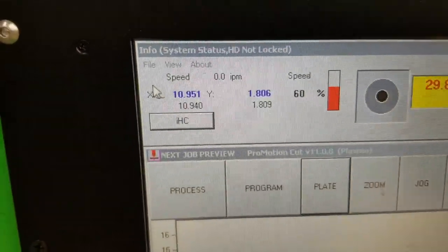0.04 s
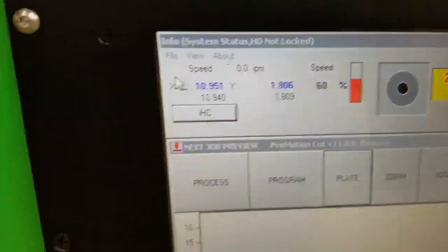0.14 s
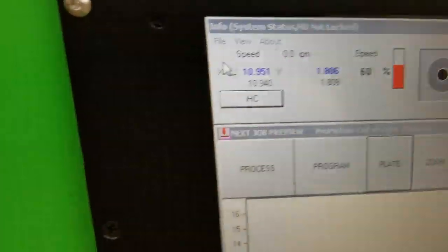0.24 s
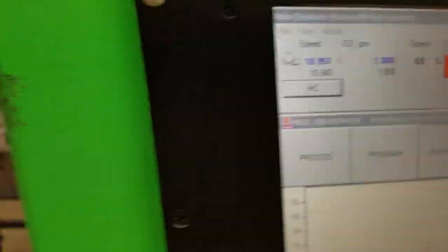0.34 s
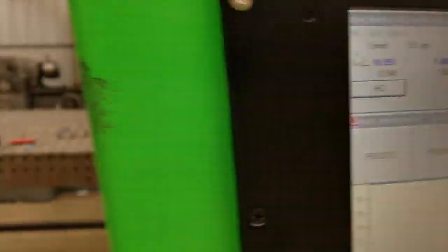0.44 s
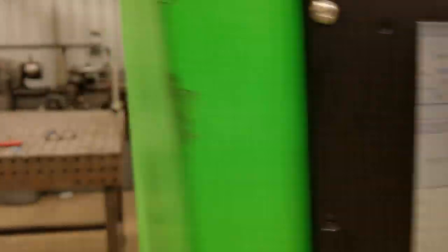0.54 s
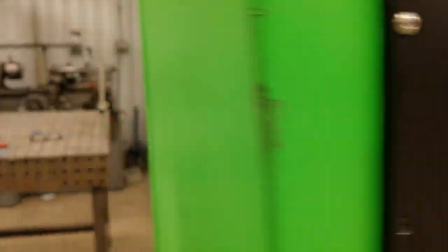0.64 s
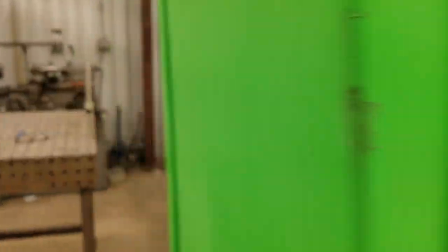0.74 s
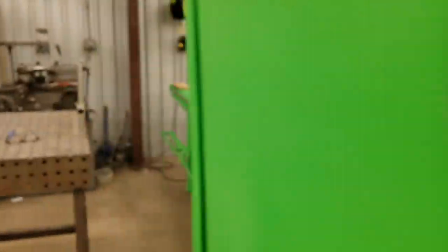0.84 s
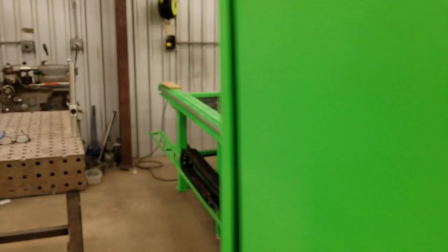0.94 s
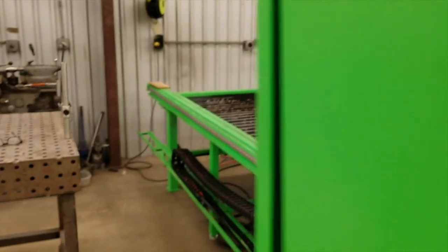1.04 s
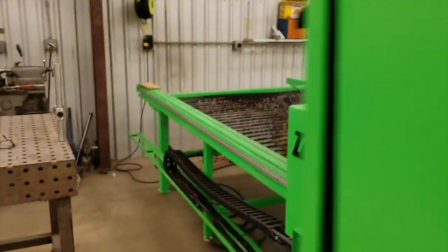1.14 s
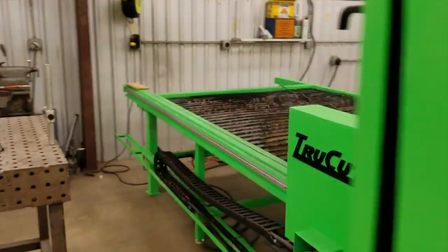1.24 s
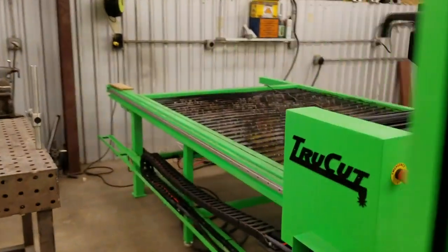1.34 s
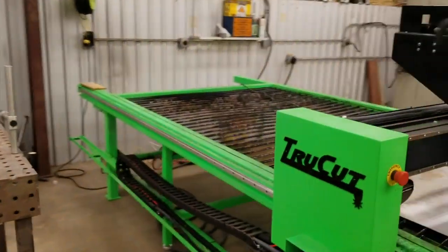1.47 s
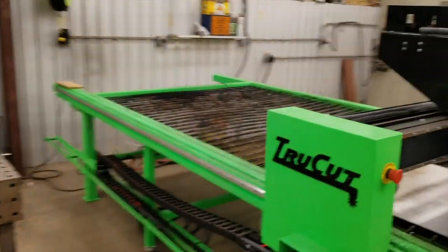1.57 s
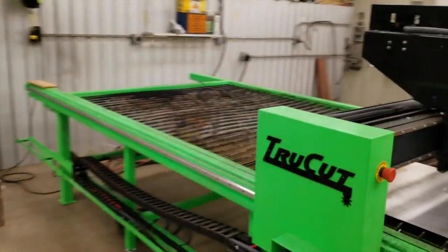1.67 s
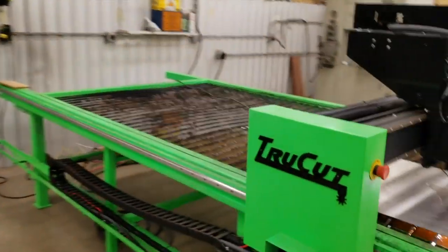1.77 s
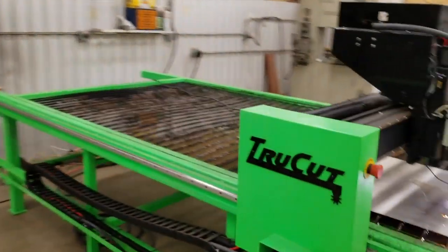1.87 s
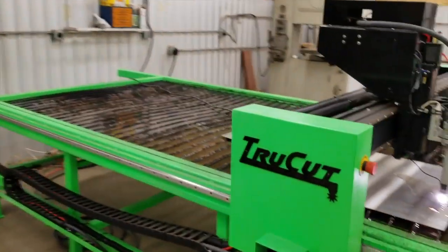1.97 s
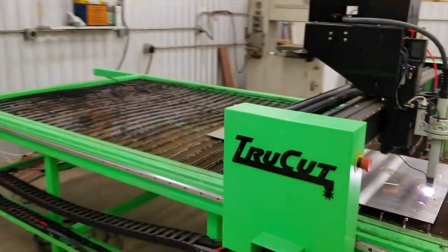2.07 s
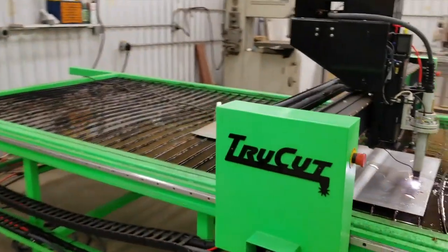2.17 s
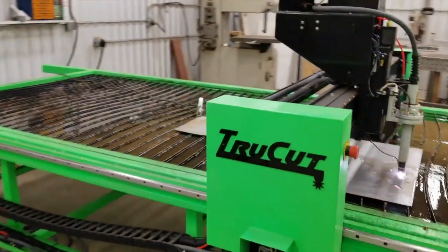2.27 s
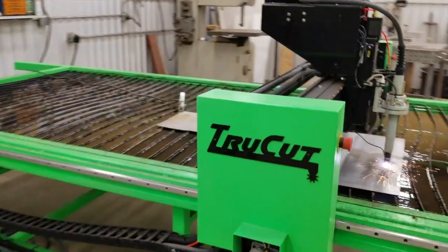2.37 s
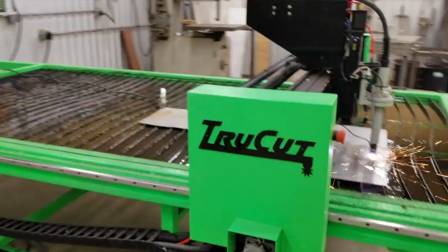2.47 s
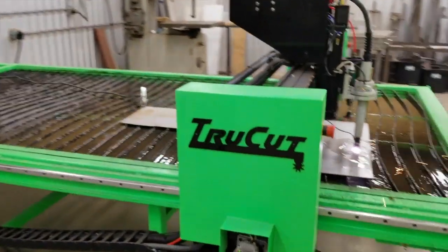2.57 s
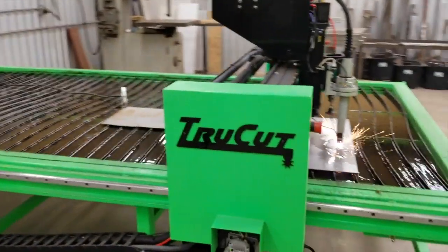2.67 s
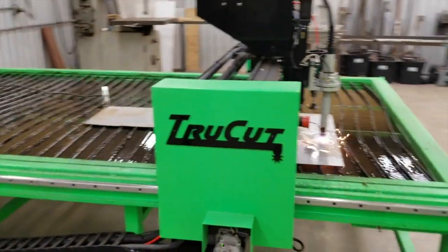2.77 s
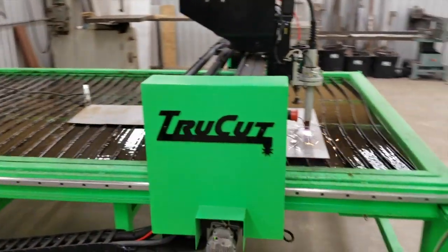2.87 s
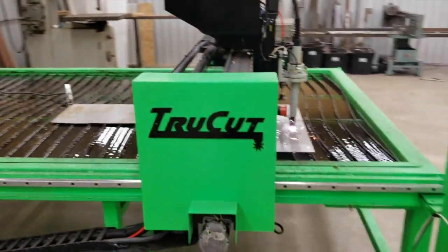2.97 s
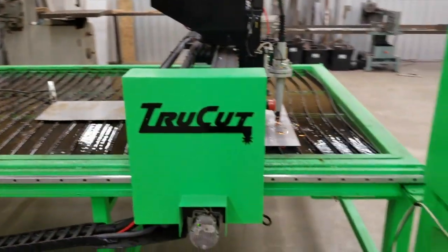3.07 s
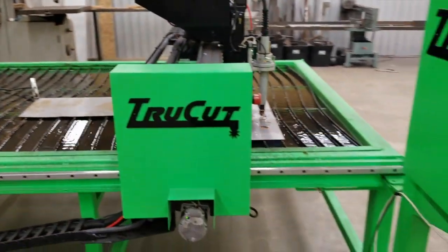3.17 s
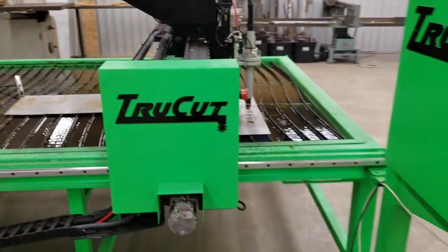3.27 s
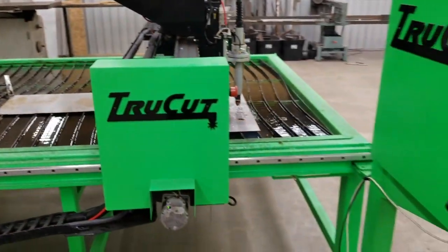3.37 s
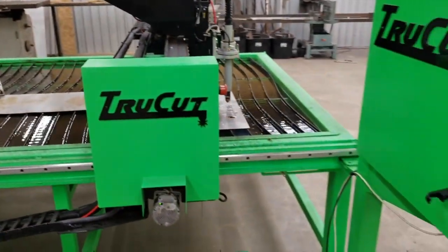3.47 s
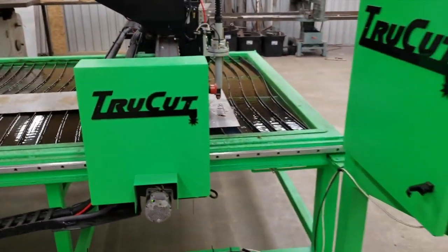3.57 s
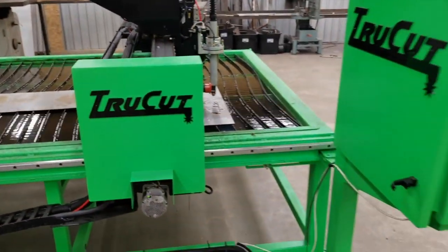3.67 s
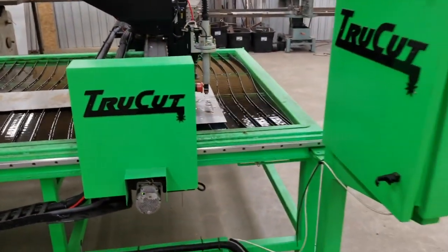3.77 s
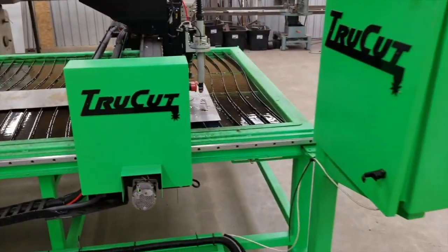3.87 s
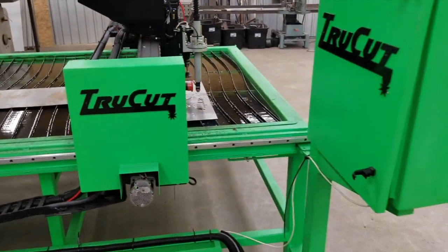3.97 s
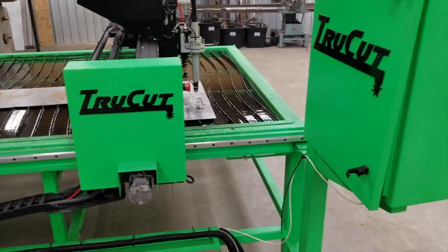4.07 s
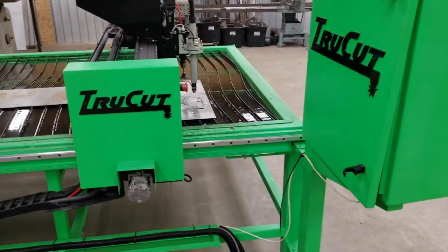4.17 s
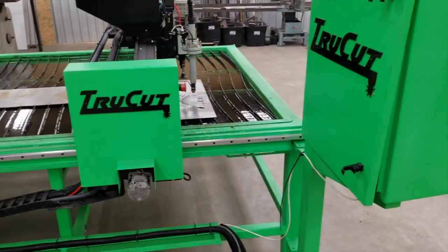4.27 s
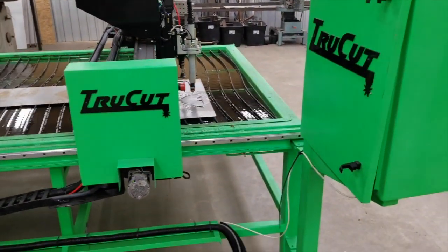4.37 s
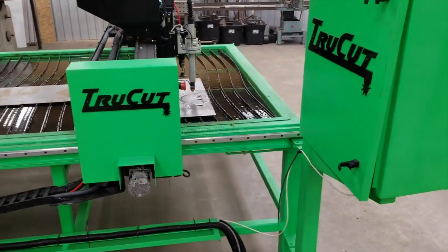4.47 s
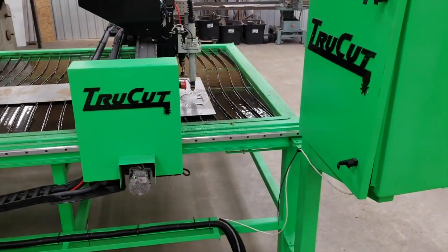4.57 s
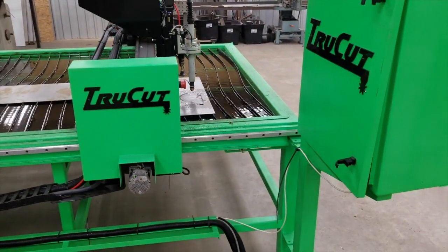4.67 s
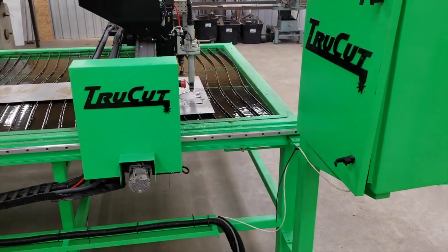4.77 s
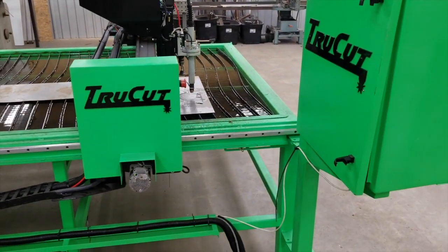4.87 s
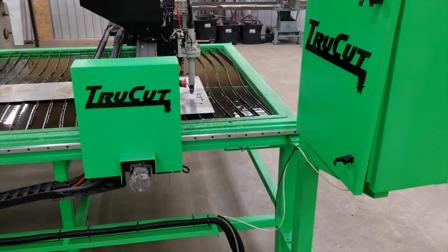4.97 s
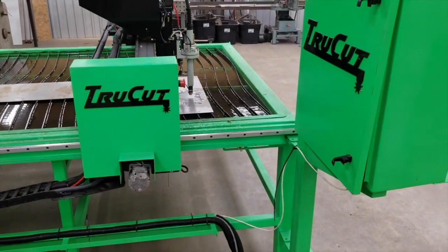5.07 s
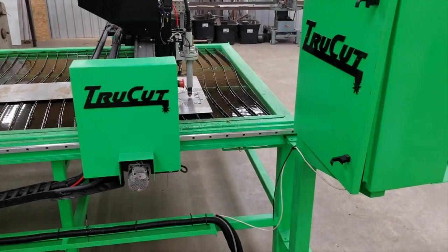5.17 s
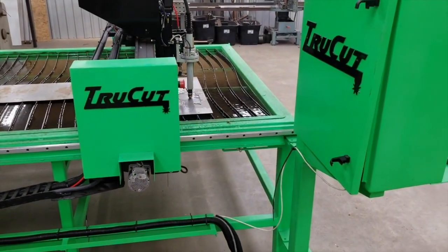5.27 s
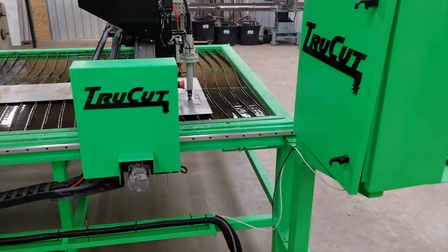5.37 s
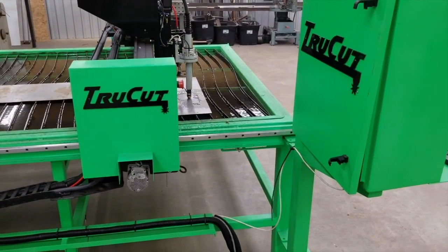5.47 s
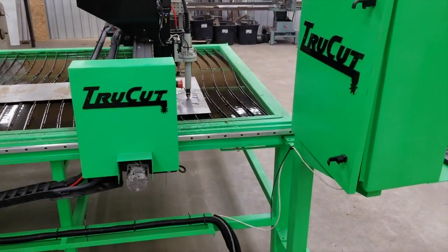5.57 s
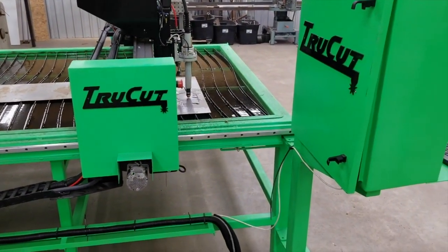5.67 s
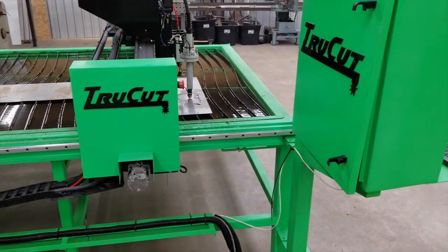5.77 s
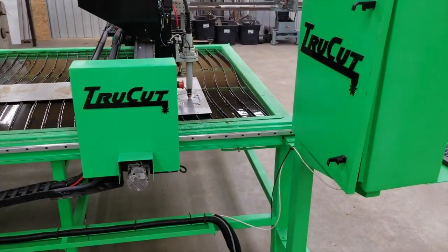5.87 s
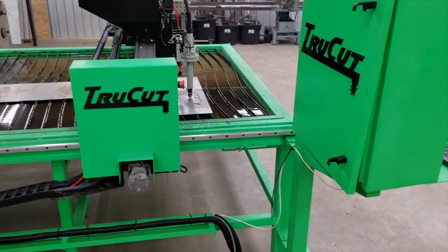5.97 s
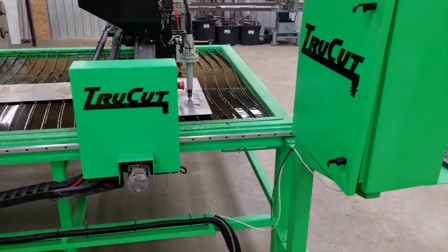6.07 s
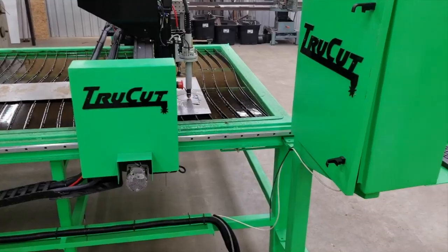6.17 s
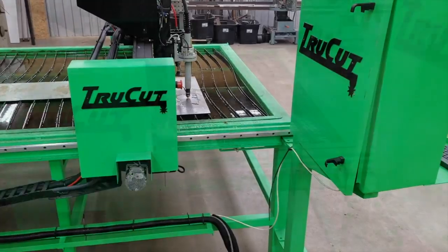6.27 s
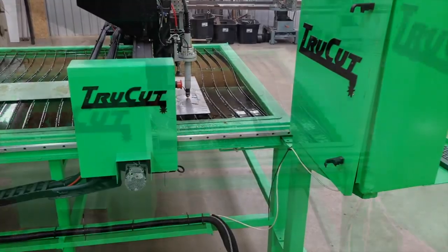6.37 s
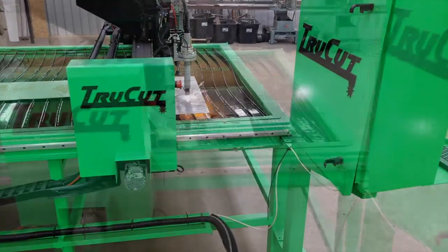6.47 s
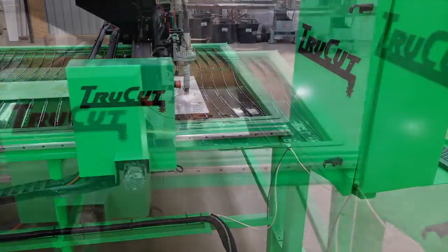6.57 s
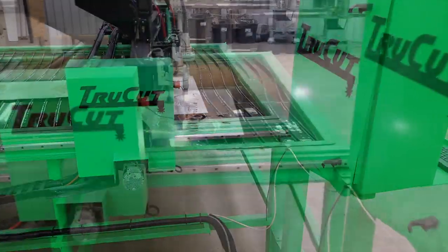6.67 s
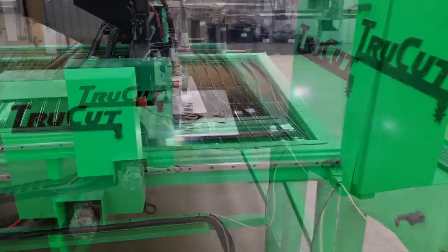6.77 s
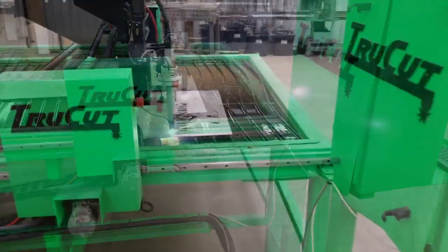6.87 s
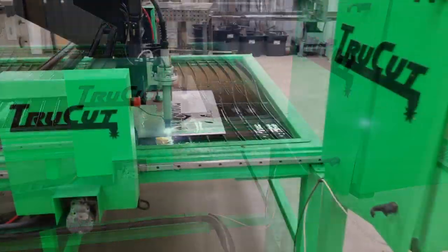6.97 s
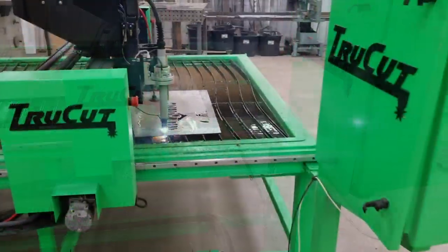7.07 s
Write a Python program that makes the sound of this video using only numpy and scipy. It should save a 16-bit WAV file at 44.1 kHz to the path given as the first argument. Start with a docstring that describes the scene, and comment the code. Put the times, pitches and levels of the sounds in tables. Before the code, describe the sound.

A plasma torch cuts steel sheet in a workshop, heard in stereo by a microphone moving round the table. From 0 to 1 s a bright, airy hiss with a rushing midrange runs steadily, then bleeds away quickly, leaving soft fan air and faint wavering hum. At about 1.57 s air hisses up, and at 1.69 s the arc snaps alight. Until about 3 s it pierces roughly: tearing surges, sputtering cracks near 2.4 s, sparks ticking, and water churning low beneath. The cut then calms into a steady hiss, with a fuller, lower roar around 4 s, thinning to a smoother, brighter rush until 5.7 s. It fades rapidly to quiet shop hum. At 6.3 s air builds again; a much sharper crack at 6.42 s starts another fierce, fluttering blast with sparks and bubbling, continuing to the end around 7.1 s.

```python
"""Plasma torch, walking the table

Place: a workshop with a plasma torch working through steel sheet; a stereo microphone pair walks round the table.
Twice the arc goes out and the air bleeds away; the valve reopens, the arc cracks alight and pierces the sheet.
Bands of unsteady noise make the hissing jet, the rushing, roaring slot and the churning water bed.
Rung impulses make the cracks and random clicks the sparks; fan air and wavering sine tones lie underneath."""
import sys
import numpy as np
from scipy import signal
from scipy.io import wavfile

SR = 44100
rng = np.random.default_rng(int(sys.argv[2]) if len(sys.argv) > 2 else 0)


def persist_wave(psi):
    """Save psi, clipped to +-1, as 16-bit WAV."""
    counts = np.round(np.clip(psi, -1, 1) * 32767).astype(np.int16)
    wavfile.write(sys.argv[1], SR, np.atleast_2d(counts).T)


N = 314414
TIME = np.arange(N) / SR

# Slow course of each cut, before the trim of each layer:
# t/s, sizzle at the tip level/dB, jet hiss level/dB, rush in the slot level/dB, roar under the sheet level/dB
CUTS = [
    [(0, -25, -28.5, -28.5, -28.5), (.4, -26.5, -28.5, -29, -32), (.75, -28, -29.5, -32, -40.5),
     (.93, -27, -30, -28.5, -35.5), (1.0, -27, -28.5, -33.5, -39.5)],
    [(1.7, -22, -28.5, -30, -35.5), (1.82, -23.5, -25, -31.5, -28), (2.3, -23, -28.5, -29, -31),
     (2.38, -17, -21, -39, -31), (2.52, -23, -21, -22.5, -38), (2.72, -27.5, -33.5, -30, -31),
     (2.97, -27, -27, -33.5, -35), (3.06, -27.5, -31.5, -39.5, -45.5), (3.3, -31.5, -30.5, -32, -39),
     (3.62, -33.5, -36, -28.5, -31.5), (3.8, -29.5, -36, -28, -28.5), (4.0, -29.5, -36, -28, -26),
     (4.1, -29, -34.5, -27.5, -29), (4.4, -27.5, -30, -31, -41), (5.05, -26, -29, -33.5, -39.5),
     (5.25, -26, -29, -31, -41.5), (5.69, -24.5, -29, -31.5, -44)],
    [(6.435, -26, -26.5, -26, -35), (6.48, -22.5, -32, -25, -37.5), (6.55, -26.5, -30, -27.5, -31.5),
     (6.7, -28.5, -31.5, -29.5, -33), (6.9, -29, -29.5, -30.5, -32.5), (7.07, -25, -26, -28.5, -26.5),
     (7.13, -26, -34, -30, -32)],
]
# Fall of sizzle, hiss, rush and roar (one row each) as the air bleeds away after a cut:
# level lost after one second/dB, power of time by which the fall steepens
BLEED = [(100, 1.48), (86, 1.62), (92, 1.78), (80.4, 1.06)]
# What a full surge adds to sizzle, hiss, rush and roar: level/dB
SURGE_GAINS = [4.6, 4.4, 7.7, 10.6]


def arc_gains():
    """Sizzle, hiss, rush and roar: the first cut already burns, the later two start at their strikes; each falls away."""
    begins = [0] + [row[1] for row in STARTS]
    gains = 0
    for cut, begin in zip(CUTS, begins):
        since_end = np.maximum(TIME - cut[-1][0], 0)
        bleed_db = np.array([lost_db * since_end ** bend for lost_db, bend in BLEED])
        gains = gains + from_db(np.array(in_time(cut)) - bleed_db) * (TIME >= begin)
    return gains * from_db(np.outer(SURGE_GAINS, digging()))


# While it pierces, the jet digs into the metal in quick surges: t/s, strength (1 = a full surge)
SURGES = [(1.94, 0.23), (2.009, 0.5), (2.075, 0.63), (2.167, 0.39), (2.24, 0.59), (2.405, 0.28),
          (2.47, 0.5), (2.59, 0.23), (2.669, 0.45), (2.778, 0.25), (6.52, 0.65), (6.58, 0.58), (6.65, 0.46),
          (6.765, 0.74), (6.835, 0.68)]
SURGE_S = 0.028   # a surge swells for this long and fades as fast


def digging():
    """How hard the jet digs into the metal, 1 in a full surge."""
    return sum(strength * swell(TIME - s, SURGE_S) for s, strength in SURGES)


# Sizzle spectrum at the torch tip: f/Hz, level/dB per Hz (relative)
SIZZLE = [(9000, -46), (10500, 2), (12000, 1), (13200, 4), (14500, 0), (16000, -2)]


def tip_sizzle(sizzle, air):
    """Fine turbulence at the tip, driven by the arc and by the air before it lights."""
    gain = sizzle * from_db(2.5) + air * from_db(-4.0)
    return gain * turbulence(SIZZLE, TORCH_LIKENESS, surge_db=-1.2, eddy_db=1.0, eddy_hz=45, count=6)


# Hiss spectrum of the jet: f/Hz, level/dB per Hz (relative)
HISS = [(3000, -16), (5500, -6), (6800, -1.5), (8300, 1), (9400, 1), (10500, -6.5), (12000, -5),
        (14000, -35)]


def jet_hiss(hiss, air):
    """The free jet hisses with slow eddies."""
    gain = hiss * from_db(1.5) + air * from_db(-4.5)
    return gain * turbulence(HISS, TORCH_LIKENESS, surge_db=1.0, eddy_db=1.9, eddy_hz=11.7, count=13)


# Rush spectrum in the slot: f/Hz, level/dB per Hz (relative)
RUSH = [(1500, -38), (2400, -7), (3200, 1), (4200, 4.5), (5300, 1), (6300, -0.5), (7500, -24), (9000, 5)]


def slot_rush(rush, air):
    """Gas rushes through the slot, fluttering quickly from band to band."""
    gain = rush * from_db(2.0) + air * from_db(-11.5)
    return gain * turbulence(RUSH, TORCH_LIKENESS, surge_db=0.5, eddy_db=3.0, eddy_hz=29.8, count=13)


# Roar spectrum under the sheet: f/Hz, level/dB per Hz (relative)
ROAR = [(500, -4.5), (800, -10), (1100, 2.5), (1450, -0.5), (1850, 2.5), (2400, 2.5), (3000, -5.5),
        (4200, -13)]


def under_roar(roar, air):
    """The blast roars under the sheet in coarser, deeper turbulence."""
    gain = roar * from_db(0.5) + air * from_db(-19.5)
    return gain * turbulence(ROAR, TORCH_LIKENESS, surge_db=0.75, eddy_db=3.5, eddy_hz=30.0, count=14)


# Resonances of the nozzle: the low one against the hiss, the high one against the sizzle (dB)
NOZZLE_LOW_DB, NOZZLE_HIGH_DB = -6.5, -7.5


def nozzle(hiss, sizzle, air, flutter_db):
    """Two broad resonances of the torch sing unsteadily in the jet while it blows."""
    low = (hiss + air) * from_db(NOZZLE_LOW_DB) * resonant_noise(5280, 560)
    high = (sizzle + air) * from_db(NOZZLE_HIGH_DB) * resonant_noise(10940, 990)
    return low * waver(flutter_db * drift(32)) + high * waver(flutter_db * drift(30))


# Swells of ringing noise, each around one pitch: short bursts of the jet, and long faint resonances
# lasting up to two seconds; levels before the trim in scene():
# peak t/s, swell and equal fade/s, centre f/Hz, width/Hz, level/dB, glide/Hz per s
RINGING_SWELLS = [(0.09, 0.33, 1830, 278, -28.5, 1), (0.44, 0.19, 1810, 260, -32, -2),
                  (0.1, 0.85, 3880, 600, -30.5, 0), (0.06, 0.49, 3040, 600, -33, 2),
                  (0.401, 1, 365, 68.6, -45, 2), (0.94, 0.14, 1810, 896, -39.5, 0),
                  (1.12, 0.17, 1760, 1300, -46, 0), (1.789, 0.067, 3500, 800, -25.5, 0),
                  (1.849, 0.029, 2950, 1200, -26, 0), (1.814, 0.11, 2030, 400, -27, 0),
                  (1.909, 0.02, 5800, 900, -23, -6), (1.935, 0.031, 3200, 800, -24.5, -15000),
                  (2.058, 0.043, 244, 69.4, -33.5, 0), (2.073, 0.041, 1260, 600, -22.5, 0),
                  (2.168, 0.038, 3580, 2200, -17.5, -15000), (2.209, .03, 6760, 1000, -27, -15000),
                  (2.35, 0.1, 2570, 500, -25.5, 0), (2.47, 0.094, 2290, 350, -28.5, 0),
                  (2.37, 0.039, 13000, 1600, -19, 0), (2.37, 0.11, 3700, 600, -30, 0),
                  (2.484, 0.05, 13500, 2400, -17, 0), (2.408, 0.048, 5740, 1200, -20.5, 0),
                  (2.45, 0.32, 680, 162, -35, 4), (2.518, 0.029, 4800, 600, -21, 0),
                  (2.59, 0.044, 5100, 600, -21, 0), (2.662, 0.045, 1075, 150, -30, 0),
                  (2.78, 0.035, 1080, 200, -31.5, 0), (2.845, .03, 585, 220, -34, 0),
                  (2.93, 0.048, 1070, 120, -38, 0), (2.812, 0.03, 3000, 1200, -26, 0),
                  (2.945, 0.035, 2670, 900, -31.5, 0), (3.037, 0.03, 447, 340, -33, 0),
                  (3.3, 0.4, 303, 120, -52, 4), (3.05, 0.064, 3200, 3000, -42, 0),
                  (3.35, 0.42, 5000, 796, -31, 3), (3.69, 0.22, 1880, 400, -32.5, 3),
                  (3.859, 0.16, 1160, 350, -32.5, -4), (3.9, 0.15, 2500, 300, -33, 0),
                  (3.9, 0.096, 710, 200, -36, 0), (4.005, .04, 1120, 201, -28, -3000),
                  (4.6, 0.63, 1250, 496, -40.5, 1), (4.7, .5, 5370, 554, -31.5, 1),
                  (4.75, .7, 7850, 550, -42, 1), (4.32, 0.19, 238, 30, -48, -1),
                  (5.0, 0.74, 289, 50, -49.5, -0.5), (5.1, 0.57, 370, 25, -50, -8),
                  (5.69, 0.068, 7700, 4000, -25, 0), (5.981, 0.2, 4260, 2410, -41.5, 0),
                  (5.35, 0.82, 11100, 800, -28.5, 1.5), (5.55, 0.37, 2320, 450, -43.5, 2),
                  (6.44, 0.025, 11500, 897, -16, 0), (6.64, 0.2, 1110, 190, -36, -3),
                  (6.651, 0.037, 5770, 1700, -21.5, -25000), (6.764, 0.043, 694, 503, -28, 0),
                  (7.04, 0.1, 3000, 500, -29.5, -12000), (7.075, 0.068, 1790, 350, -29, -16000),
                  (7.0, 0.08, 1320, 300, -36.5, -6000), (7.07, 0.13, 734, 348, -35, -2500)]


def ringing_swells():
    """Noise ringing around one pitch swells and fades, as short bursts or long faint resonances; some dive in pitch."""
    out = np.zeros((2, N))
    for s, length, hz, width_hz, level_db, glide in RINGING_SWELLS:
        at = np.flatnonzero(abs(TIME - s) < length)
        offset = TIME[at] - s
        ringing = signal.hilbert(resonant_noise(hz, width_hz, size=len(at)))
        gliding = np.real(ringing * np.exp(1j * np.pi * glide * offset ** 2))
        out[:, at] += from_db(level_db) * swell(offset, length) * gliding
    return out


# Air valve opens and arc strikes:
# valve t/s, strike t/s, air flow halfway through the build-up level/dB, crack level/dB
STARTS = [(1.566, 1.686, -36, -17.5), (6.298, 6.4202, -36.5, -8.5)]
VALVE_OPENING_S = .03   # the air valve takes this long to open fully


def air_flow():
    """Pressure builds in the torch from the valve's opening to the strike."""
    flow = np.zeros(N)
    for valve, strike, flow_db, _ in STARTS:
        build = np.clip((TIME - valve) / (strike - valve), 0, 1)
        opening = np.sqrt(np.clip((TIME - valve) / VALVE_OPENING_S, 0, 1))
        flow += from_db(flow_db - 15.0 * (.5 - build)) * opening * (TIME < strike)
    return flow


# The arc sputters while it catches, and when molten metal splashes into it: t/s, level/dB
SPUTTERS = [(1.6997, -22), (2.3575, -18), (2.3625, -18), (2.3738, -18), (2.4038, -16), (2.4658, -16),
            (2.4795, -18), (6.4252, -16), (6.429, -21), (6.4325, -20), (6.4383, -17), (6.446, -19)]
# What a crack rings with: f/Hz, width/Hz, level/dB
CRACK_RING = [(11400, 1100, 1.5), (13200, 1500, 0), (15500, 1800, -5), (5300, 900, -8), (4000, 6400, -8)]
CRACK_S = .0007   # rise time of the crack


def strikes():
    """The arc lights with a sharp crack that rings in the nozzle; each sputter is a smaller crack."""
    burst = np.zeros(N)
    for s, crack_db in [(row[1], row[3]) for row in STARTS] + SPUTTERS:
        age = np.maximum(TIME - s, 0) / CRACK_S
        burst += from_db(crack_db) * age * np.exp(1 - age)
    ring = sum(from_db(level_db) * resonant_noise(hz, width_hz) for hz, width_hz, level_db in CRACK_RING)
    return burst * ring


# Sparks against the sizzle when it stands at the knee; in dB they grow twice as fast as it
SPIT_DB, SPIT_KNEE_DB = -11, -12


def spatter(sizzle, rush, roar):
    """Sparks spit with the rush and roar, and ever more as the sizzle swells."""
    spitting = sizzle ** 2 * from_db(SPIT_DB - SPIT_KNEE_DB)
    gain = rush * from_db(-10.5) + roar * from_db(-11.5) + spitting
    return gain * sparks(per_s=260, spread_db=0.5)


def sparks(per_s, spread_db):
    """Droplets of steel burst at random, each a tiny tick of its own size in one of four bands; rms 1."""
    out = 0
    edges = np.geomspace(1200, 16000, 5)
    for low, high in zip(edges, edges[1:]):
        at = np.flatnonzero(rng.random(N) < per_s / SR)   # per_s ticks in each band
        size = from_db(spread_db * np.minimum(rng.exponential(1, len(at)), 3))
        clicks = np.zeros((2, N))
        clicks[:, at] = size * rng.uniform(-0.94, 1, (2, len(at)))
        out = out + band(clicks + 1e-18, low, high)
    return rms_one(out)


# Walking with the pair: t/s, position along the path/m, lag of the left ear/ms, torch in plain view (0-1)
WALK = [(0, 0.033, 0.33, 0.33), (1.0, 0.17, 0.34, 0), (1.7, 0.45, 0.19, 0.3), (2.05, 0.63, 0.19, 0.28),
        (2.5, 0.66, 0.15, 0.02), (2.9, 0.83, 0.065, 0.33), (3.35, 0.97, -0.0098, 0.2),
        (4.0, 1.21, -0.02, 0.2), (5.0, 1.26, -0.004, 0.21), (5.8, 1.32, -0.0067, 0.27),
        (6.43, 1.28, 0.012, 0.3), (7.13, 1.317, 0.032, 0)]
# Close echoes off edges beside the microphone, a list for the left and one for the right ear;
# they sweep the hiss as the listener turns:
# detour when facing the torch/ms, added detour/ms per ms of ear lag, signed strength
EDGE_ECHOES = [
    [(0.323, .67, -0.18)],
    [(.29, -0.424, -0.49), (.665, -1.34, -0.24)],
]
VIEW_DB = -6   # change of the echoes when the torch is in full view


def heard_on_the_walk(x, scatter_db, longest_s, count):
    """In plain view the torch nears one point; echoes off sheet and machine comb it, detours shifting with the walk."""
    metres, lag_ms, view = in_time(WALK)
    view = np.clip(view, 0, 1)
    mid, side = (x[0] + x[1]) / 2, (x[0] - x[1]) / 2
    narrowed_side = side * np.sqrt(1 - view) * [[1], [-1]]
    x = mid * np.sqrt(1 + view * np.var(side) / np.var(mid)) + narrowed_side
    echoes = from_db(scatter_db + VIEW_DB * view)
    high_pass = signal.butter(2, 850, "high", fs=SR, output="sos")
    ears = []
    for ear, lag, edges in zip(x, (lag_ms / 1000, 0), EDGE_ECHOES):
        near, = delayed(ear, [lag])
        # walking to or from a reflector changes its detour at the speed of sound, 343 m/s
        detours = [rng.uniform(.002, longest_s) + rng.uniform(-1, 1) * metres / 343 for _ in range(count)]
        copies = delayed(near, np.abs(detours))
        scattered = sum(rng.choice([-1, 1]) * copy for copy in copies) / np.sqrt(count)
        glances = delayed(mid, [lag + (detour_ms + shift * lag_ms) / 1000 for detour_ms, shift, _ in edges])
        glancing = np.sqrt(view) * sum(row[2] * copy for row, copy in zip(edges, glances))
        # long waves bend round the small panels instead of bouncing off them
        bounced = signal.sosfilt(high_pass, echoes * scattered + glancing)
        ears.append((near + bounced) / np.hypot(1, echoes))
    return np.array(ears)


# The blast breaks through into the water bed: start t/s, length/s, level/dB before the water trim
BLASTS = [(1.87, 0.27, -24), (2.141, 0.12, -22), (2.378, 0.33, -36), (2.821, 0.071, -28.5),
          (3.009, 0.012, -29), (6.647, 0.18, -30), (6.913, .2, -35)]
BLAST_ATTACK_S, BLAST_RELEASE_S = 0.012, 0.1
WATER_REST_DB = -50   # lapping at rest, before the water trim
WATER_STIR_DB, WATER_HISS_DB = -10.5, -17.5   # stirring against the roar, and by the plain jet against its hiss


def churn(hiss, roar):
    """The water laps, is stirred by the jet, and boils up under each blast with a quick attack, a hold and a release."""
    stirred = (roar * from_db(WATER_STIR_DB)) ** 2 + (hiss * from_db(WATER_HISS_DB)) ** 2
    power = from_db(WATER_REST_DB) ** 2 + stirred
    for start, length, level_db in BLASTS:
        attack = np.clip((TIME - start) / BLAST_ATTACK_S, 0, 1)
        release = np.exp(-np.maximum(TIME - start - length, 0) / BLAST_RELEASE_S)
        power = power + (from_db(level_db) * attack * release) ** 2
    return np.sqrt(power)


# Spectrum of the water bed: f/Hz, level/dB per Hz (relative)
WATER = [(130, -17), (200, -8), (260, -6.5), (370, 0.5), (450, -0.5), (630, 7), (760, 6.5), (950, 3),
         (1400, -8)]


def water_bed(hiss, roar):
    """Low churning noise of the water, ringing in the low modes of the room."""
    noise = turbulence(WATER, LOW_LIKENESS, surge_db=1.7, eddy_db=3.0, eddy_hz=15.0, count=12)
    return room_boom(churn(hiss, roar) * from_db(-7.0) * noise)


# Low resonances of the workshop room, which the churning water excites: f/Hz, width/Hz, boost level/dB
ROOM_MODES = [(243, 15, 8), (295, 9.1, 9), (374, 4, 13.5), (481.5, 10, 5), (523, 15.5, 7), (643, 25, 6.5),
              (740, 13, 5.5)]


def room_boom(x):
    """The churning rings in the low resonances of the workshop room."""
    boosted = x
    for hz, width_hz, boost_db in ROOM_MODES:
        ringing = signal.lfilter(*signal.iirpeak(hz, hz / width_hz, fs=SR), x)
        boosted = boosted + (from_db(boost_db) - 1) * ringing
    return boosted


# Shop background: t/s, fan air level/dB before its trim, gain of the tones level/dB
SHOP_LEVEL = [(0, -49, 3.5), (1.45, -52, 3), (1.9, -57.5, -1.5), (2.7, -70, -13), (3.04, -55, -6),
              (3.3, -61, -7.5), (4.2, -56.5, 0), (5.6, -52, 2), (6.2, -57, 2.5), (6.83, -53, -8),
              (6.95, -57, -5)]
# Spectrum of the fan air: f/Hz, level/dB per Hz (relative)
SHOP = [(25, -22), (60, -12), (110, -7), (170, -1.5), (240, -3.5), (320, -1), (450, -7.5), (800, -13),
        (1000, -17), (1700, -16.5), (3200, -15), (5500, -27), (10000, -43), (15000, -34)]
# Fan and motor tones: f/Hz, level/dB before the gain above, unsteadiness/dB
HUM = [(118, -58, 5), (240.7, -56, 4), (266, -58.5, 4.5), (780, -64, 2), (804, -53, 4.5), (873, -67, 7),
       (2080, -69.5, 1.5), (3140, -69, 1.5)]


def shop():
    """Air noise of the fans with their tones, which waver in level and slightly in pitch."""
    level_db, tones_db = in_time(SHOP_LEVEL)
    noise = turbulence(SHOP, LOW_LIKENESS, surge_db=2.0, eddy_db=1.0, eddy_hz=24, count=22)
    air = from_db(level_db + 5.5) * noise
    tones = 0
    for hz, tone_db, unsteady_db in HUM:
        pitch = hz * waver(.007 * unsteady_db * drift(6))
        phase = 2 * np.pi * np.cumsum(pitch) / SR
        wobble = waver(unsteady_db * drift(10.5))
        ear_phase = rng.normal(0, 0.079, (2, 1))
        tones = tones + from_db(tone_db) * wobble * np.sin(phase + ear_phase)
    return air + tones * from_db(tones_db)


# Left-right likeness at the pair, of the low sounds and of the torch: f/Hz, likeness (1 = same in both ears)
LOW_LIKENESS = [(60, .96), (250, .93), (500, .72), (1000, .4), (3000, .1)]
TORCH_LIKENESS = [(500, 0.99), (2000, 0.49), (5000, 0.18), (15000, 0.14)]


def resonant_noise(hz, width_hz, size=N):
    """Stereo turbulence ringing in one broad resonance; rms 1."""
    mid, side = band(rng.standard_normal((2, size)), hz - width_hz / 2, hz + width_hz / 2)
    return rms_one(stereo(mid, side, at_hz(TORCH_LIKENESS, hz)))


def turbulence(spectrum, likeness, surge_db, eddy_db, eddy_hz, count):
    """Stereo noise in bands that surge together and flutter each on its own; rms 1."""
    edges = np.geomspace(spectrum[0][0], spectrum[-1][0], count + 1)
    white = rng.standard_normal((2, 2, N))
    out = 0
    for k, (low, high) in enumerate(zip(edges, edges[1:])):
        mid, side = band(white[k % 2], low, high)   # neighbouring bands use unrelated noise
        hz = np.sqrt(low * high)
        gain = from_db(at_hz(spectrum, hz)) * waver(eddy_db * drift(eddy_hz))
        out = out + gain * stereo(mid, side, at_hz(likeness, hz))
    return rms_one(out * waver(surge_db * drift(34)))


def stereo(mid, side, alike):
    """Two ears with a given likeness from two unrelated noises."""
    alike = np.clip(alike, -1, 1)
    return np.sqrt(1 + alike) * mid + np.sqrt(1 - alike) * side * [[1], [-1]]


def delayed(x, delays):
    """Copies of x, each late by its own delay in seconds, fixed or moving."""
    fine = signal.resample_poly(x, 4, 1)   # quarter-sample steps
    return [fine.take(np.rint((TIME - delay) * 4 * SR).astype(int), mode="clip") for delay in delays]


def band(x, low_hz, high_hz):
    """Butterworth band-pass with its edges kept in range."""
    edges = [max(low_hz, 10), min(high_hz, .45 * SR)]
    return signal.sosfilt(signal.butter(2, edges, "band", fs=SR, output="sos"), x)


def swell(offset_s, length_s):
    """A smooth rise to 1 at offset zero and an equal fall."""
    return np.cos(np.pi / 2 * np.clip(offset_s / length_s, -1, 1)) ** 2


def drift(rate):
    """Smooth chance of spread 1 moving below about rate Hz, one value every 40 samples."""
    r = np.exp(-80 * np.pi * rate / SR)
    noise = rng.standard_normal(N // 40 + 2002)
    return rms_one(signal.lfilter([1], [1, -2 * r, r * r], noise)[2000:])   # settled part only


def waver(db):
    """A slow series of decibels as a gain of unit power at every sample."""
    return np.interp(np.arange(N), np.linspace(0, N, len(db)), rms_one(from_db(db)))


def in_time(rows):
    """Each column of a curve, at every sample."""
    s, *columns = np.transpose(rows)
    return [np.interp(TIME, s, c) for c in columns]


def at_hz(points, hz):
    """Read a spectrum on a log-frequency axis."""
    table = np.array(points)
    return np.interp(np.log(hz), np.log(table[:, 0]), table[:, 1])


def from_db(db):
    """Decibels to gain."""
    return 10 ** (np.asarray(db) / 20)


def rms_one(x):
    """Scale to unit power."""
    return x / np.sqrt(np.mean(x ** 2) + 1e-20)


RASP_DB, RASP_HZ = 2.5, 260   # depth in a full surge, and rate, of the jet's quick tearing


def scene():
    """The torch and its table over the hum of the shop."""
    sizzle, hiss, rush, roar = arc_gains()
    air = air_flow()
    # tip and jet lean 1 dB to the right
    torch = (tip_sizzle(sizzle, air) + jet_hiss(hiss, air)) * from_db([[-.5], [.5]])
    torch = torch + slot_rush(rush, air) + under_roar(roar, air)
    torch = torch + nozzle(hiss, sizzle, air * from_db(-3.0), flutter_db=2.5) + from_db(1.5) * ringing_swells()
    # the arc wanders in the slot and shakes the whole jet, which tears while it digs
    tearing = waver(RASP_DB * drift(RASP_HZ)) ** np.sqrt(np.abs(digging()))
    shaken = torch * tearing * waver(0.8 * drift(89))
    walked = heard_on_the_walk(shaken, scatter_db=-1.5, longest_s=.011, count=9)
    return walked + spatter(sizzle, rush, roar) + strikes() + water_bed(hiss, roar) + shop()


# The left microphone port rings a little; everything above the cutoff is removed
PORT_HZ, PORT_WIDTH_HZ, PORT_DB = 4340, 1600, 1.3
CUTOFF_HZ = 15800


def record(dry):
    """The left port colours the sound, mainly the highest peaks are rounded, and the top is cut."""
    port = signal.lfilter(*signal.iirpeak(PORT_HZ, PORT_HZ / PORT_WIDTH_HZ, fs=SR), dry[0])
    heard = np.array([dry[0] + (from_db(PORT_DB) - 1) * port, dry[1]])
    rounded = heard / (1 + (heard / .8) ** 4) ** .25
    low_pass = signal.ellip(12, .1, 80, CUTOFF_HZ, fs=SR, output="sos")
    return signal.sosfilt(low_pass, rounded)


dry = scene()
out = record(dry)
persist_wave(out)
```